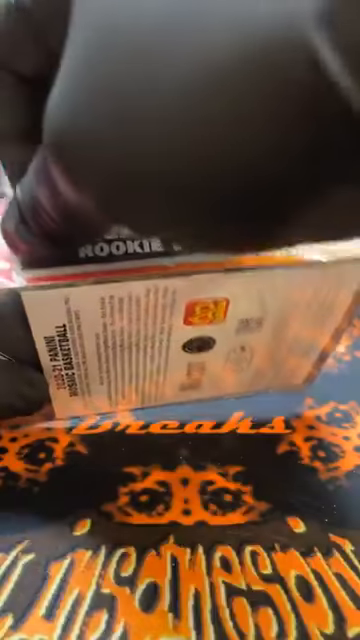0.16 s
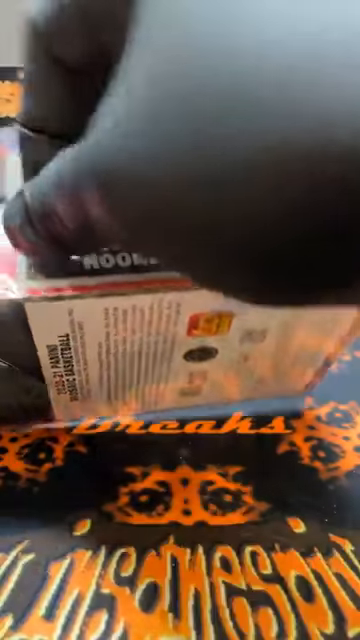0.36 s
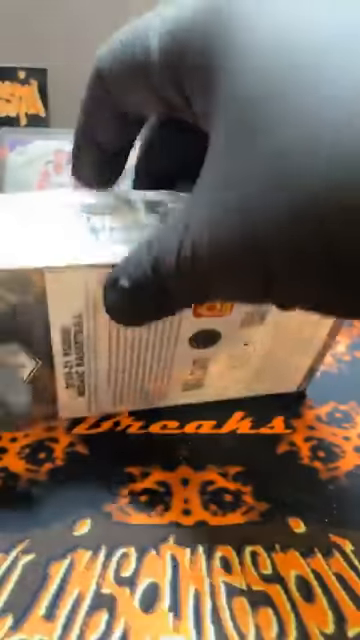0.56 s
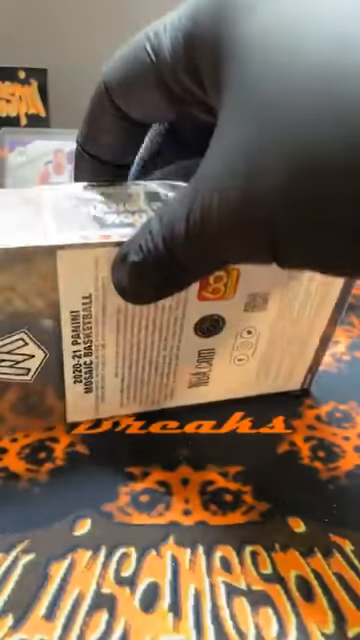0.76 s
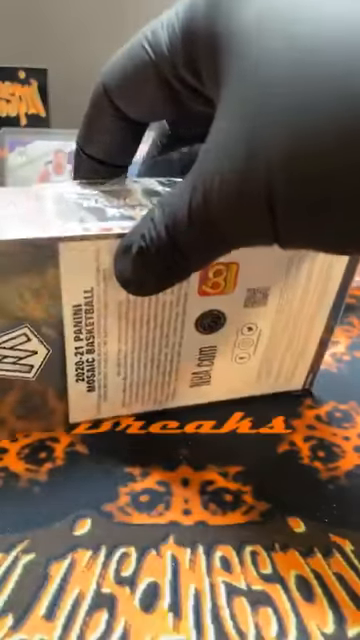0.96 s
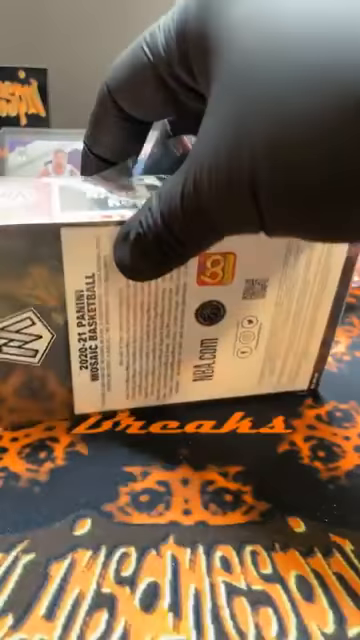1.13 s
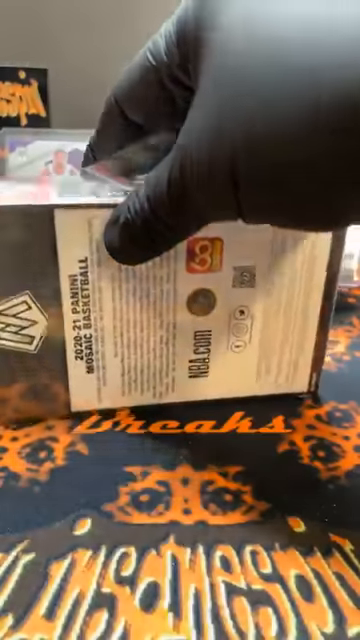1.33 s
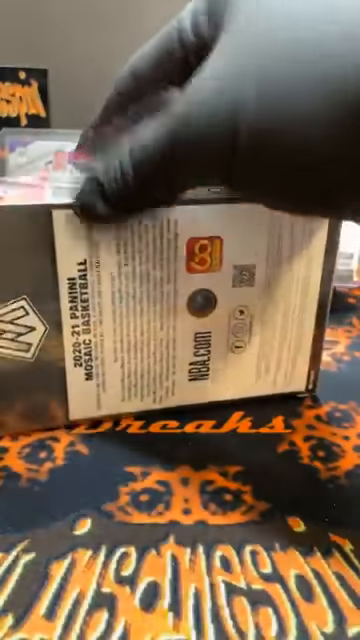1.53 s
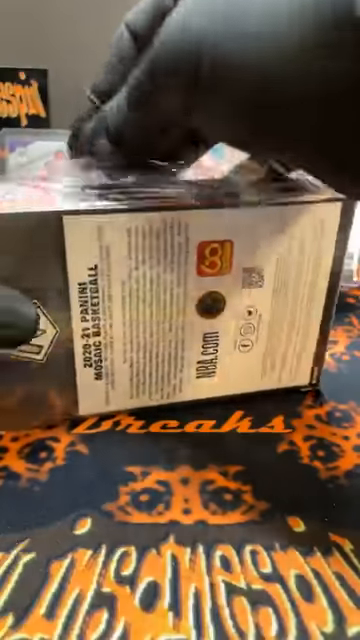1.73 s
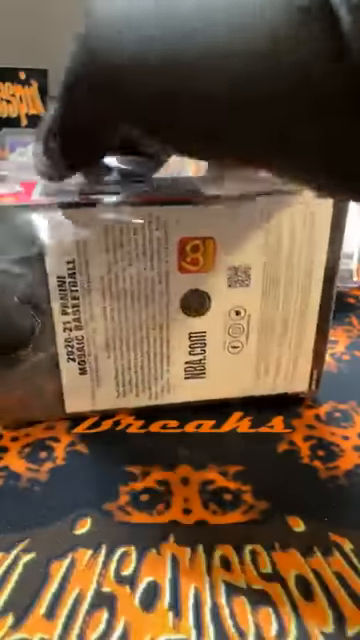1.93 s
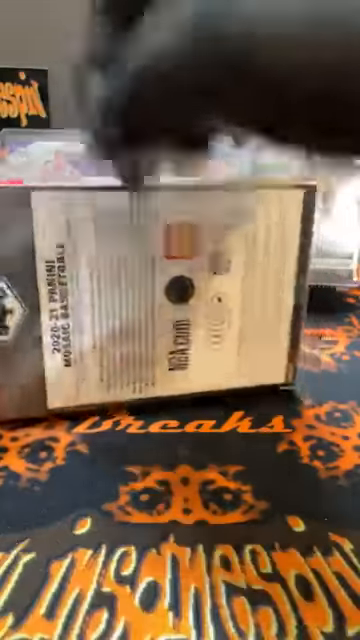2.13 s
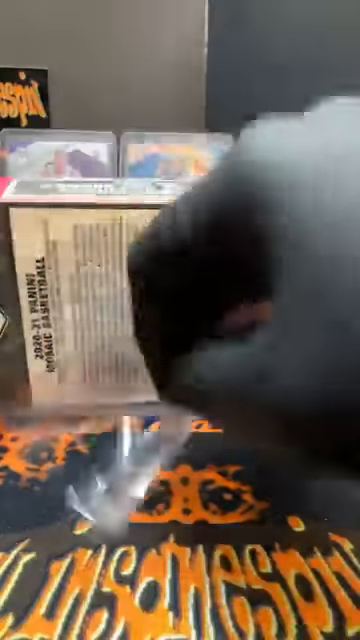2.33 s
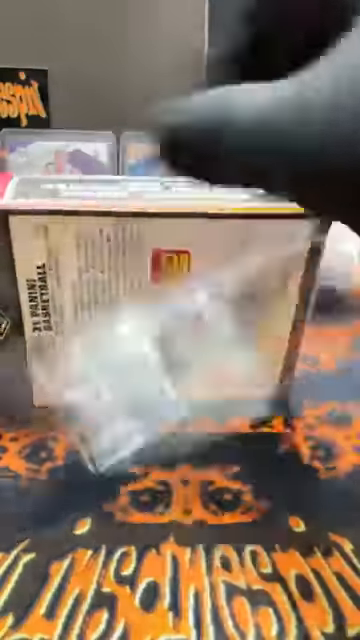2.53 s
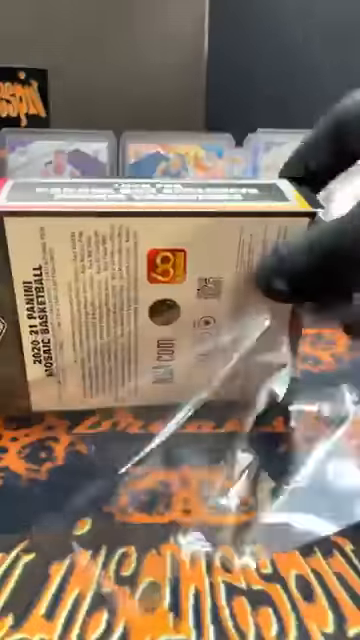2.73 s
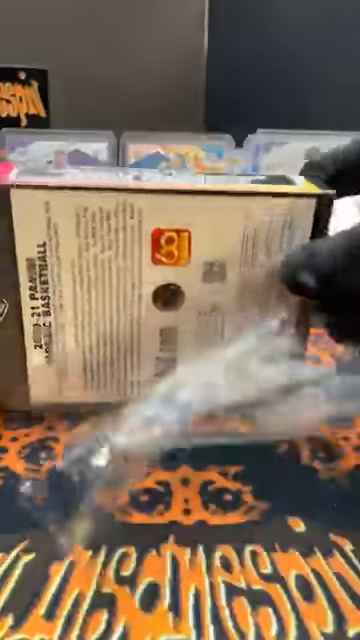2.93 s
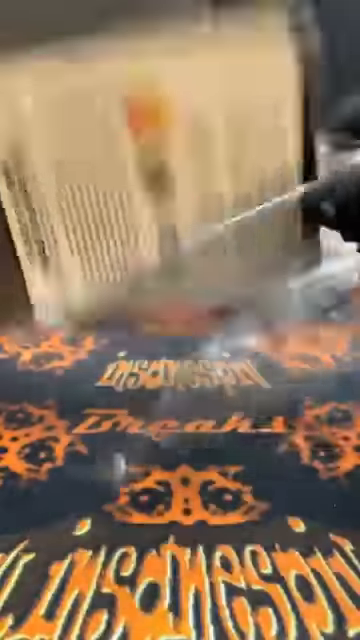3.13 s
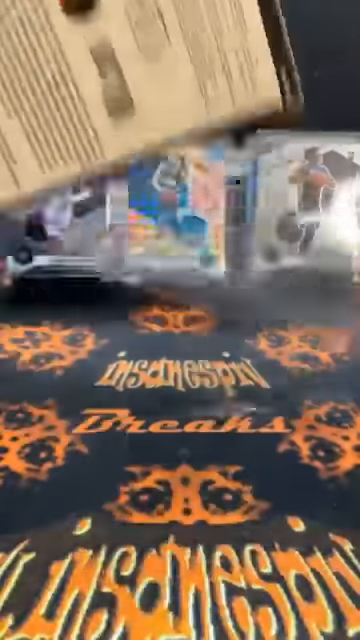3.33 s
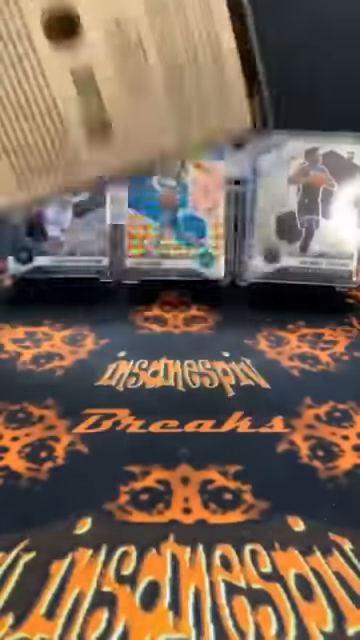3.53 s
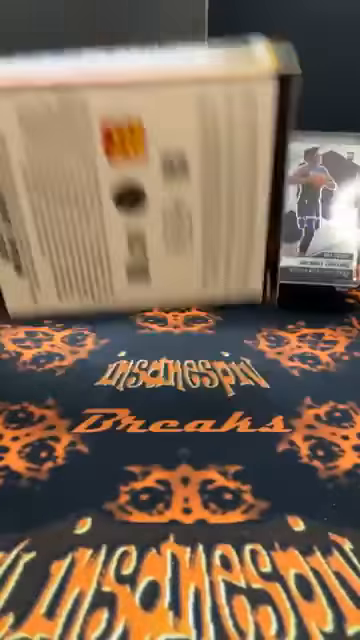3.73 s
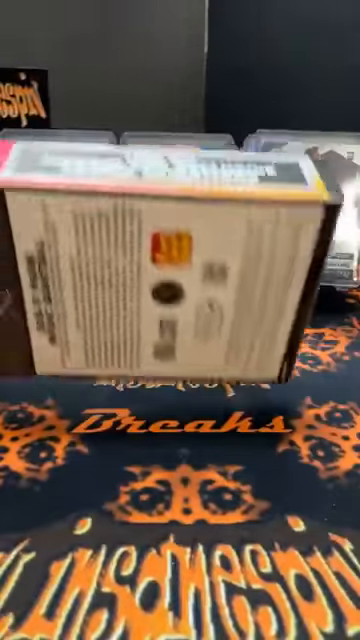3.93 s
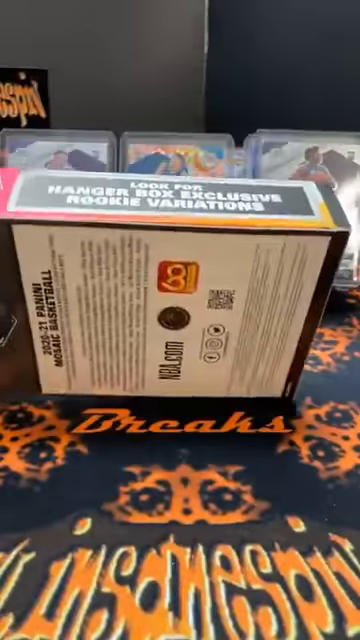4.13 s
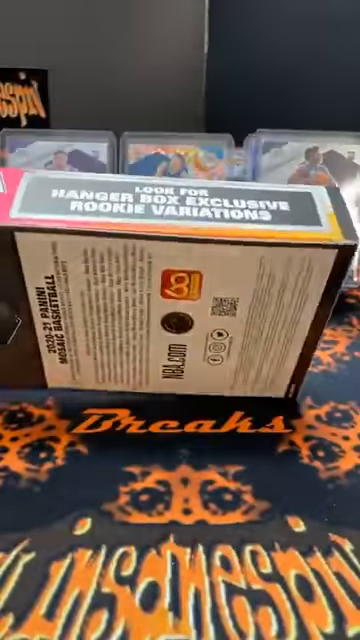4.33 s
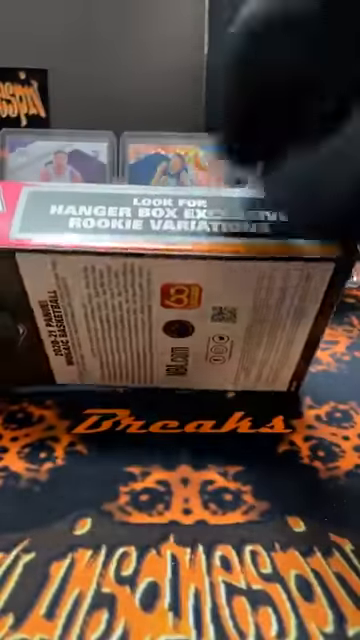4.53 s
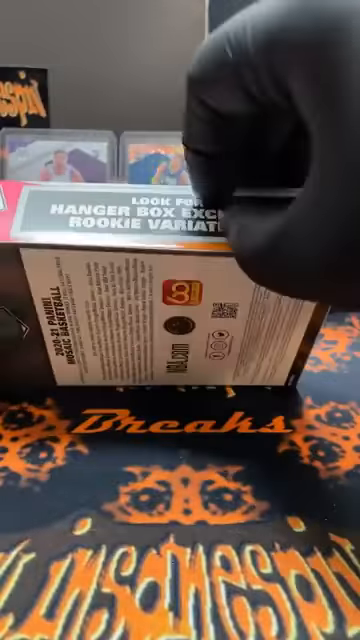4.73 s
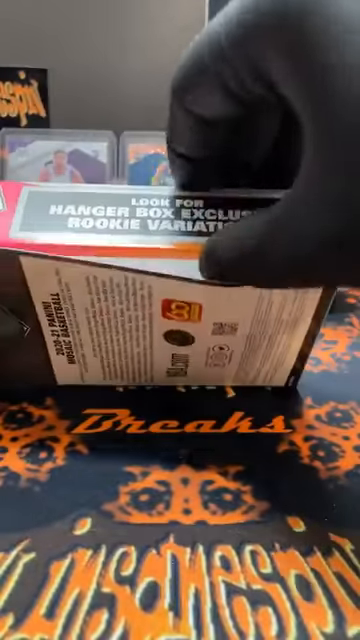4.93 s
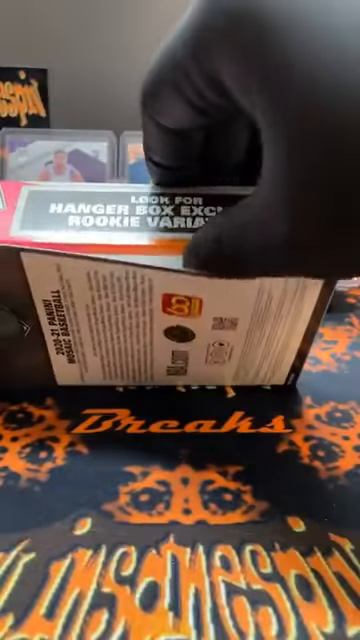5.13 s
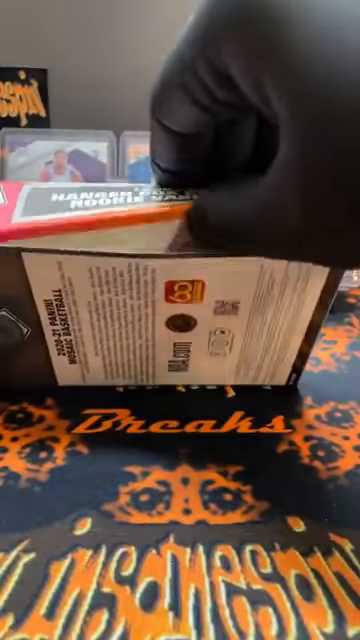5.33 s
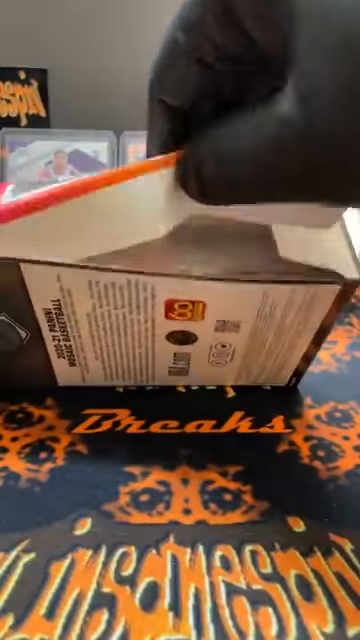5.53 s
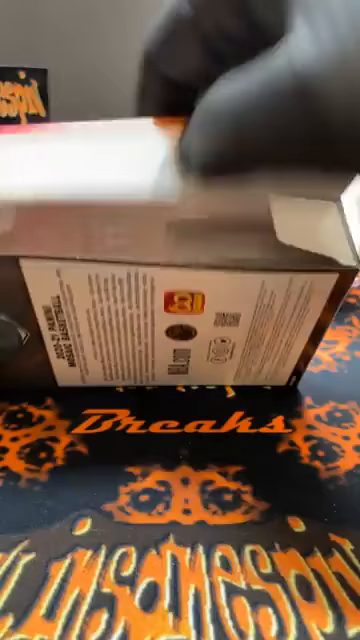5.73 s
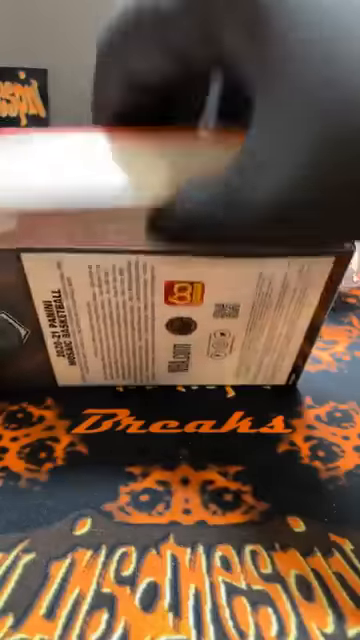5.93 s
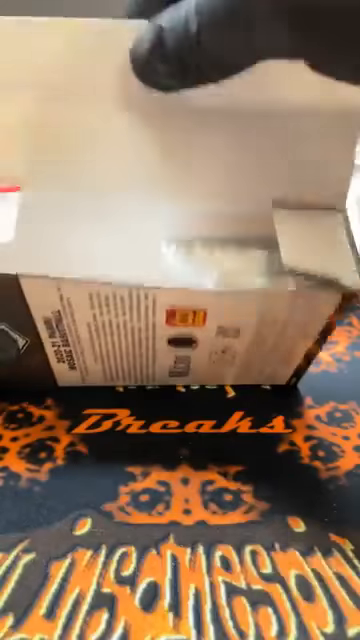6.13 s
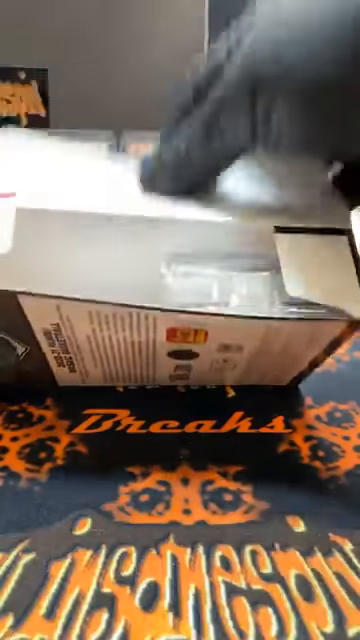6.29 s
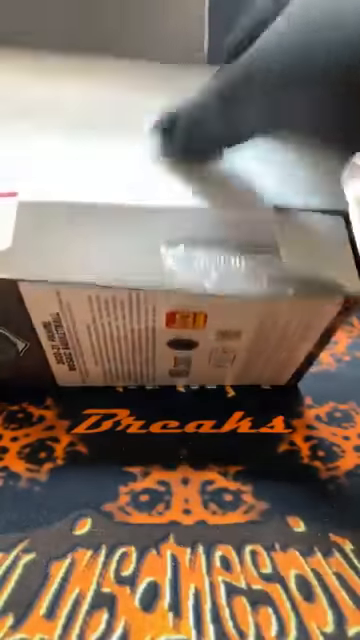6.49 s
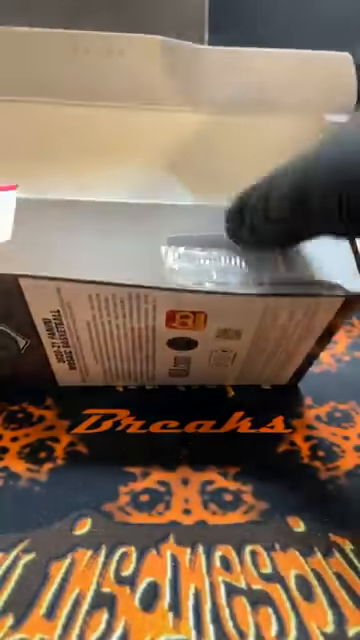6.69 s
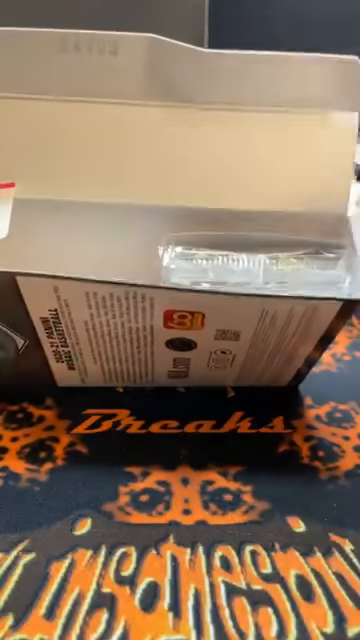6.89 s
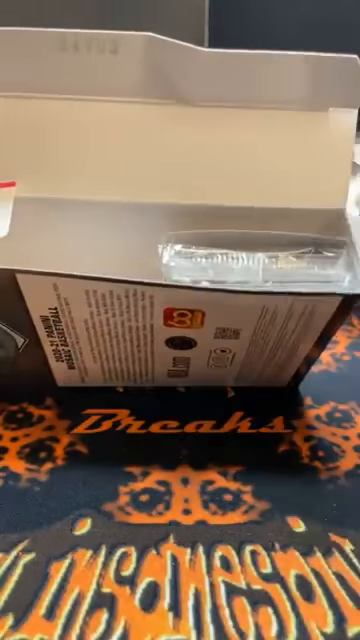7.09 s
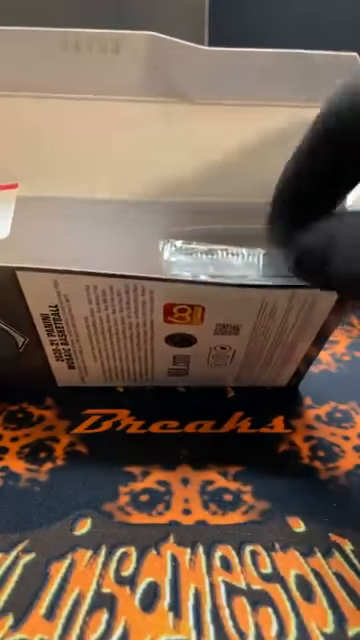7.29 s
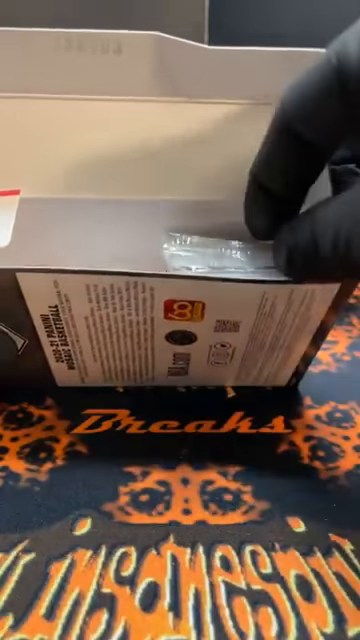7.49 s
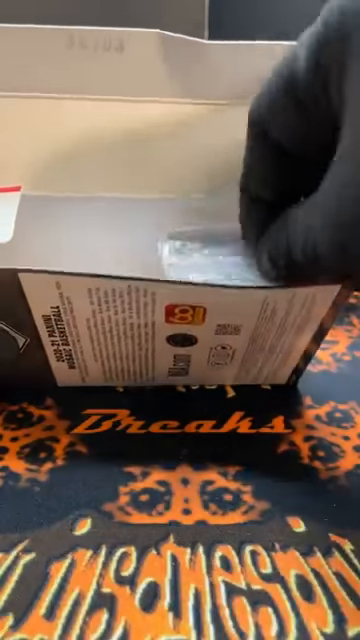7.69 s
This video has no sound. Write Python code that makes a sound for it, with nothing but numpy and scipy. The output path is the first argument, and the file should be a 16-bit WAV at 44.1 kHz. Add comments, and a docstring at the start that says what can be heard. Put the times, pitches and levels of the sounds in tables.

```python
"""Unwrapping a small carton

Gloved hands pull the stiff film off a small carton, pry its flap open and reach for a foil pack inside.
Creases in film, card and foil buckle and snap; gloves rustle, creak and glide over the walls. The hollow
carton knocks under the fingers and thumps on the mat, under a close microphone in a quiet room."""
import sys
import numpy as np
from scipy import signal
from scipy.fft import rfft, irfft, next_fast_len
from scipy.io import wavfile
from scipy.ndimage import uniform_filter1d

SR = 44100
rng = np.random.default_rng(int(sys.argv[2]) if len(sys.argv) > 2 else 0)


def waveform_to_disk(signal):
    """Save audio, clipped to [-1, 1], as 16-bit WAV at the path in sys.argv[1]."""
    frames = np.transpose(np.atleast_2d(signal))
    scaled = np.clip(frames, -1, 1) * 32767
    samples = np.round(scaled).astype(np.int16)
    wavfile.write(sys.argv[1], SR, samples)


N = 341775
TIME = np.arange(N) / SR
LEAD = 2048   # samples of room for an event to swell before its cue
FILM_LOOSE_S, FILM_OFF_S = 3.35, 3.75   # the film lifts from the walls, then comes away
CARD_S, OPEN_S, FOIL_S = 4.5, 5.55, 7.28   # nails start on the flap, it opens, fingers reach the foil
# resonances of the air in the opened carton: f/Hz, width/Hz, level/dB
AIR_MODES = [(780, 55, 6.5), (1840, 310, 5), (4800, 200, -7), (5510, 590, -3.5), (3000, 210, -7.5),
             (3600, 140, -3.5), (4200, 200, -13.5)]


def snaps():
    """A crease buckles in a spray of tiny cracks: the freed patch rings briefly, the treble dies first."""
    # creases giving way: t/s, level/dB, ring f/Hz, t60/s
    creases = [(0.0305, -10.5, 5830, 0.0023), (0.0527, -1.5, 2050, 0.011), (0.0657, -8, 2000, 0.0032),
               (0.082, -8, 4000, 0.01), (0.137, -23, 4560, 0.006), (0.169, -28.5, 5500, 0.0049),
               (0.182, -31.5, 5500, 0.0044), (0.2367, -4.5, 2070, 0.0074), (0.25, -12.5, 8000, 0.0086),
               (0.2724, -14, 2180, 0.0055), (0.291, 0, 7600, 0.01), (0.3032, -18.5, 4000, 0.0059),
               (0.3471, -13, 5030, 0.0053), (0.3928, -9.5, 7550, 0.0028), (0.442, -8, 4660, 0.012),
               (0.5227, -3, 6000, 0.0039), (0.536, -8.5, 5700, 0.056), (0.6005, -8.5, 5700, 0.0092),
               (0.6165, -10, 4100, 0.057), (0.6598, -9.5, 7300, 0.039), (0.7856, -30, 4500, 0.0045),
               (0.8145, -15.5, 4130, 0.003), (0.826, -18, 4700, 0.016), (0.841, -15, 4700, 0.013),
               (0.8599, -5, 4600, 0.0015), (0.958, -21, 4200, 0.008), (1.038, -8, 4240, 0.006),
               (1.0457, -9, 4950, 0.0087), (1.0532, -7, 6800, 0.0052), (1.0938, -3.5, 5100, 0.0047),
               (1.1292, -5.5, 6030, 0.0057), (1.148, -19.5, 2410, 0.02), (1.169, -4, 5500, 0.029),
               (1.2814, -22.5, 5560, 0.0051), (1.324, -9.5, 7200, 0.027), (1.353, -6, 8450, 0.0038),
               (1.3669, -2, 2700, 0.0021), (1.3817, -14.5, 3120, 0.074), (1.388, -27, 3450, 0.008),
               (1.4117, -6.5, 3300, 0.0055), (1.435, -8.5, 6170, 0.013), (1.4443, -15, 3230, 0.025),
               (1.469, -12, 5900, 0.064), (1.5052, -18.5, 5250, 0.089), (1.554, -25.5, 3800, 0.008),
               (1.605, -26, 4450, 0.0099), (1.613, -18, 4960, 0.01), (1.617, -3.5, 4180, 0.013),
               (1.627, -14.5, 5040, 0.062), (1.646, -15, 4000, 0.015), (1.6625, -18.5, 3500, 0.0076),
               (1.672, -25, 4200, 0.007), (1.69, -23.5, 5000, 0.008), (1.7105, -11.5, 7900, 0.019),
               (1.724, -9, 1920, 0.0078), (1.729, -13, 5540, 0.0079), (1.748, -4.5, 6000, 0.013),
               (1.7662, -6, 3280, 0.012), (1.773, -7.5, 2250, 0.038), (1.7853, -20, 3070, 0.0061),
               (1.7948, -9.5, 8930, 0.0061), (1.8183, -11, 3340, 0.0075), (1.824, -20.5, 2500, 0.012),
               (1.855, -18, 7000, 0.006), (1.8626, -1.5, 5140, 0.036), (1.8797, -4, 4000, 0.023),
               (1.8927, -7, 4150, 0.025), (1.898, -4.5, 3770, 0.011), (1.917, -20, 3670, 0.014),
               (1.9627, -15.5, 4730, 0.011), (1.995, -18.5, 3060, 0.0043), (2.029, -22, 7050, 0.008),
               (2.0497, -8, 3250, 0.0058), (2.0627, -4, 5700, 0.011), (2.081, -14, 4200, 0.0055),
               (2.0883, -8, 5900, 0.028), (2.0982, -13.5, 4430, 0.078), (2.106, -5.5, 7750, 0.015),
               (2.131, -17, 2470, 0.01), (2.1365, -8.5, 4800, 0.0082), (2.1827, -17, 5900, 0.008),
               (2.197, -18, 4670, 0.019), (2.2126, -3, 2180, 0.0059), (2.2147, -2.5, 5360, 0.011),
               (2.271, -7.5, 2630, 0.014), (2.2844, -9.5, 2030, 0.0059), (2.29, -13, 7350, 0.0086),
               (2.3099, -8, 8600, 0.0091), (2.324, -11, 5140, 0.0052), (2.345, -9.5, 7500, 0.0079),
               (2.371, -4, 3080, 0.0031), (2.413, -20, 5500, 0.006), (2.419, -26, 4000, 0.0099),
               (2.4267, -10, 8700, 0.014), (2.4646, -5.5, 5560, 0.023), (2.4685, -2.5, 7800, 0.025),
               (2.472, -5, 5950, 0.013), (2.492, -16, 3970, 0.031), (2.4983, -9.5, 3500, 0.065),
               (2.5657, -13.5, 1590, 0.0082), (2.5753, -4.5, 5440, 0.036), (2.579, -11.5, 3560, 0.042),
               (2.585, -14, 4470, 0.022), (2.598, -11, 2450, 0.025), (2.605, -15, 3500, 0.02),
               (2.6574, -9, 2250, 0.012), (2.6873, -30, 5000, 0.008), (2.7126, -3, 5030, 0.012),
               (2.7517, -7.5, 3680, 0.053), (2.7636, -10, 5500, 0.011), (2.773, -5, 3580, 0.02),
               (2.7957, -4, 4800, 0.019), (2.835, -13.5, 7560, 0.019), (2.9148, -6.5, 3900, 0.066),
               (2.926, -16.5, 2980, 0.026), (2.9572, -5, 5370, 0.0096), (2.9681, -7, 6900, 0.013),
               (3.06, -28, 5100, 0.0099), (3.073, -29, 6440, 0.0074), (3.082, -30, 1970, 0.014),
               (3.1603, -16.5, 5360, 0.013), (3.177, -11.5, 3250, 0.032), (3.1963, -7.5, 2520, 0.012),
               (3.206, -8.5, 7550, 0.024), (3.229, -6, 3670, 0.017), (3.2417, -6, 3480, 0.12),
               (3.255, -8.5, 5170, 0.033), (3.284, -10.5, 5360, 0.076), (3.2923, -19.5, 5500, 0.012),
               (3.3057, -26, 5610, 0.013), (3.355, -23, 5500, 0.008), (3.376, -37, 5350, 0.008),
               (3.4078, -17, 6400, 0.024), (3.5161, -12.5, 6950, 0.002), (3.528, -21.5, 2430, 0.025),
               (3.559, -17.5, 6900, 0.007), (3.591, -14, 3480, 0.014), (3.611, -20, 3490, 0.013),
               (3.6204, -9, 6150, 0.0041), (3.644, -17, 3660, 0.0052), (3.6568, -9.5, 4860, 0.0047),
               (3.6607, -7.5, 7330, 0.0085), (3.874, -17, 7200, 0.024), (3.917, -27, 6670, 0.094),
               (4.336, -6.5, 3950, 0.01), (4.562, -16, 3700, 0.019), (4.652, -18, 6230, 0.0061),
               (4.87, -32, 3900, 0.018), (4.915, -19.5, 5600, 0.041), (4.923, -18.5, 3180, 0.019),
               (4.984, -32, 1660, 0.036), (5.0711, -15.5, 6800, 0.0027), (5.192, -28.5, 5800, 0.0039),
               (5.229, -26, 2750, 0.0031), (5.241, -18.5, 2220, 0.028), (5.472, -23, 4300, 0.0085),
               (5.484, -19, 5800, 0.022), (5.5325, -8.5, 4200, 0.031), (5.5352, -3.5, 2130, 0.012),
               (5.544, -12, 4500, 0.015), (5.5578, -13, 3600, 0.0068), (5.611, -40.5, 1480, 0.016),
               (5.645, -48, 3160, 0.01), (5.7243, -6, 3400, 0.0053), (5.773, -35, 1260, 0.011),
               (5.793, -41, 1010, 0.011), (5.818, -17, 3140, 0.027), (5.987, -37.5, 1250, 0.021),
               (5.997, -42, 3200, 0.012), (6.026, -42, 1690, 0.013), (6.097, -41, 1280, 0.015),
               (6.156, -41, 1550, 0.023), (6.203, -37, 7000, 0.006), (6.2113, -27, 5400, 0.014),
               (6.235, -34, 6500, 0.006), (6.3536, -15, 1860, 0.0043), (6.401, -43, 5950, 0.014),
               (6.5, -28, 5400, 0.04), (6.515, -27.5, 3600, 0.021), (6.708, -45.5, 4550, 0.043),
               (6.738, -59.5, 2030, 0.011), (7.093, -42, 4540, 0.01), (7.3817, -8.5, 9200, 0.013),
               (7.485, -21.5, 5530, 0.0046), (7.507, -11.5, 7800, 0.01), (7.5333, -17.5, 5600, 0.0072),
               (7.549, -22.5, 8360, 0.013), (7.5813, -15.5, 6040, 0.0061), (7.6105, -10, 4750, 0.0018),
               (7.6258, -12, 6770, 0.01), (7.6588, -7, 5400, 0.005), (7.6876, -18.5, 6300, 0.015),
               (7.7218, -22.5, 2950, 0.0087)]
    out, noise = np.zeros(N), rng.standard_normal((len(creases), 2, 5632))
    first_crack = 3.0 * (np.arange(5632) == LEAD)
    for (s, peak_db, hz, t60), (body, edge) in zip(creases, noise):
        card = CARD_S < s < FOIL_S
        loose = FILM_LOOSE_S < s < CARD_S or s > FOIL_S
        woody_db = -8.5 if card and hz < 3300 and peak_db < -20 else 0   # low, soft card sprays little
        treble_db = -8 + 14.5 * np.log2(hz / 4000) + 6 * edge[0]   # higher rings are brighter
        treble_db += woody_db - 7 * card   # card is duller than film and foil
        clump_db = 3 * np.clip(t60 / .025 - .6, 0, 1)   # long snaps come in uneven clumps
        clumps = from_db(clump_db * rms_one(butter(body[::-1], 150, "low")))
        cracks = burst(clumps * body * np.abs(edge[::-1]) + first_crack, t60, swell_s=0.0054)
        spread = from_db(2 * body[0])   # some patches ring purer than others
        width_hz = 0.32 * hz * spread
        ring = resonance(resonance(cracks, hz, width_hz), hz, width_hz) / np.sqrt(spread)
        lowest_hz = (0.39 if loose else 0.37) * hz   # film held by the walls reaches deeper
        spray = from_db(0.14 * treble_db - 7.5 + woody_db) * butter(cracks, [lowest_hz, 8000], "band")
        treble = butter(burst(edge, 0.6 * t60 + .002, swell_s=0.004), [8000, 16500], "band")
        add(out, s, 0.63 * ring + spray + from_db(treble_db - 16.5) * treble, peak_db)
    return out


def squeak(hz=5100, width_hz=300):
    """A taut patch of film lets go at once and rings at one pitch."""
    out, crack = np.zeros(N), burst(rng.standard_normal(4096), t60=0.012, swell_s=0.0026)
    ring = resonance(resonance(crack, hz, width_hz), hz, width_hz)
    add(out, s=0.3992, sound=ring + 0.0087 * crack, peak_db=-6.5)
    return out


def carton(x, hz, reach_octaves, shift=1):
    """The walls answer most in the modes near the pitch of the pressed panel."""
    # modes of the free walls: f/Hz, width/Hz, level/dB
    wall_modes = [(248, 174, 16), (418, 149, 6), (572, 117, 4), (740, 150, 6), (860, 276, 4.5),
                  (1083, 133, 8), (1144, 170, 3), (1443, 240, 5.5), (1594, 306, 3.5), (1940, 300, -11),
                  (2220, 1000, 7)]
    out, grip_damping = 0, 1.5
    for k, (mode_hz, width_hz, db) in enumerate(wall_modes):
        away_db = 35.1 * (np.log2(shift * mode_hz / hz) / reach_octaves) ** 2
        out += (-1) ** k * from_db(db - away_db) * resonance(x, shift * mode_hz, grip_damping * width_hz)
    return out


def knocks():
    """A tap and a short scuffing push set the carton walls ringing."""
    # fingers working the walls: t/s, level/dB, panel f/Hz
    pushes = [(0.0538, -10, 835), (0.2379, -25, 1060), (0.3051, -23, 680), (0.5248, -22.5, 600),
              (0.624, -22, 600), (0.2523, -24.5, 730), (0.348, -24, 790), (0.8399, -22.5, 340),
              (0.922, -26, 371), (1.147, -30, 715), (2.86, -25, 780), (1.055, -33, 600), (1.095, -12, 700),
              (1.1717, -17, 545), (1.769, -23, 516), (1.8844, -36, 860), (2.1106, -16.5, 740),
              (2.1334, -21, 780), (2.7552, -29, 660), (2.8378, -24, 540), (3.121, -34, 990),
              (3.1651, -22.5, 553), (3.2068, -13, 860), (3.2267, -16.5, 650), (3.2449, -31, 770),
              (3.5929, -23.5, 340), (4.6283, -12, 600), (4.9075, -14.5, 665), (4.9155, -12, 670),
              (4.989, -29, 590), (5.2445, -13, 573), (5.5366, -8.5, 590), (5.726, -18, 600),
              (5.7299, -4.5, 297), (5.8179, -17, 467), (6.355, -14, 373), (6.773, -40.5, 890),
              (6.7897, -33, 490), (6.89, -39, 583), (7.068, -30, 348)]
    out, noise = np.zeros(N), rng.standard_normal((len(pushes), 5632))
    tap = 6.0 * (np.arange(5632) == LEAD)
    for (s, peak_db, hz), scuff in zip(pushes, noise):
        t60 = 0.01554 * from_db(0.038 * (peak_db + 10.5))   # harder pushes last longer
        push = burst(scuff + tap, t60, swell_s=0.011)
        shift = 1 + 0.07 * np.tanh(scuff[0])   # holding a wall shifts its modes
        add(out, s - .001, carton(push, hz, reach_octaves=0.85, shift=shift), peak_db)
    return out


def thumps(lag_s=0.01354):
    """The carton bumps the mat: a few low cycles sag as the contact settles; the table answers lower."""
    # bumps on the mat: t/s, level/dB, settled f/Hz
    bumps = [(0.464, -25.5, 90), (0.532, -25, 205.4), (0.588, -31, 118.5), (0.832, -25, 204.6),
             (1.09, -15.5, 97), (1.162, -31, 118), (1.763, -24.5, 176.5), (1.863, -26.5, 100.4),
             (2.109, -21, 94), (2.213, -26, 122), (2.828, -34, 129.6), (3.243, -22, 204.8),
             (4.645, -26, 108), (4.914, -21, 114.7), (5.231, -27.5, 163), (5.535, -20.5, 94.4),
             (5.722, -14, 143.4), (6.005, -31, 96), (6.137, -24.5, 163), (6.353, -29.5, 96),
             (6.783, -40, 193), (6.862, -25, 86.3), (7.062, -39, 224), (7.698, -38.5, 126)]
    out, t = np.zeros(N), np.arange(9728) / SR
    for s, peak_db, hz in bumps:
        sag = 0.0039 * np.exp(-np.maximum(t - LEAD / SR, 0) / 0.0021)
        phase = 2 * np.pi * hz * (t - sag)
        boom = np.sin(phase) + 0.7 * np.sin(0.588 * phase)
        add(out, s + lag_s, burst(boom, t60=0.1, swell_s=0.05), peak_db)
    return out


def creaks(swell_db=8.5, wobble=0.076):
    """A finger or the flap's edge stutters over a wall in quick slips, driving the modes near their rate."""
    # stutters: t/s, length/s, level/dB, first and target slip f/Hz, roughness/0-1, alternate-slip limp/0-1
    stutters = [(0.088, 0.035, -29, 1425, 740, 0.05, 0.01), (0.965, 0.0097, -17.5, 907, 860, 0.16, 0.49),
                (0.981, 0.002, -19, 894, 855, 0.2, 0.11), (0.989, 0.0215, -12.5, 875, 692, 0.45, 0.17),
                (1.018, 0.013, -8, 813, 850, 0.49, 0.23), (5.333, 0.016, -24, 549, 543, 0.26, 0.009),
                (5.358, 0.022, -26, 750, 750, 0.78, 0.01), (5.394, 0.041, -31, 555, 570, 0.51, 0.01),
                (5.442, 0.054, -27.5, 578, 595, 0.51, 0.01), (5.486, 0.029, -26, 600, 600, 0.6, 0.01)]
    out, t = np.zeros(N), (np.arange(4096) - LEAD) / SR
    noise = rng.standard_normal((len(stutters), 2, 4096))
    for (s, length_s, peak_db, hz, end_hz, rough, limp), (wander, grit) in zip(stutters, noise):
        glide_hz = end_hz + (hz - end_hz) * np.exp(-2.5 * np.maximum(t, 0) / length_s)
        cycles = np.cumsum(glide_hz * (1 + wobble * rms_one(butter(wander, 110, "low")))) / SR
        sawtooth = cycles % 1 - .5 + limp * np.sin(np.pi * cycles)
        slips = (1 - rough) * sawtooth + rough * grit
        press = from_db(swell_db * t / length_s) * (t > 0) * (t < length_s)
        add(out, s, carton(slips * press, np.sqrt(hz * end_hz), reach_octaves=1.56), peak_db)
    return out


def handling():
    """Crackle over an uneven slide of glove on film and card; part of the rubbing sounds through the walls."""
    # constant handling: t/s, rustle level/dB, its treble share/dB, rubbing level/dB
    bed = [(0.0, -54.5, 13.5, -41), (0.3, -33.5, 1, -36), (0.78, -46, 5.5, -41.5), (1.27, -51, 14, -47.5),
           (1.6, -47.5, 3.5, -37), (2.8, -32, 1, -37.5), (3.42, -46, -1.5, -46), (3.72, -88.5, 7.5, -58.5),
           (4.15, -54.5, -17.5, -56.5), (4.8, -64.5, 8.5, -49.5), (5.65, -80, -9, -49),
           (6.35, -55.5, -8.5, -53.5), (6.64, -97, 0.5, -66.5), (7.3, -63.5, -5, -63),
           (7.75, -51.5, 8.5, -39.5)]
    # tone curve of the rustle: f/Hz, gain/dB
    rustle_eq = [(600, -47), (1200, 23), (1700, 22.5), (3700, 23), (5700, 17.5), (9000, 2.5), (15500, -8.5)]
    times, *columns = np.transpose(bed)
    bed_rustle, treble, bed_rub = [from_db(np.interp(TIME, times, db)) for db in columns]
    pull, drag = strokes()
    rustle_gain, rub_gain = np.hypot(bed_rustle, pull), np.hypot(bed_rub, drag)
    slide, scrape = rng.standard_normal((2, N))
    # patches of glove catch and let go, each at its own pace
    patches = sum((-1) ** k * from_db(3.5 * drift(26)) * rms_one(resonance(slide, hz, hz / 2)) * np.sqrt(hz)
                  for k, hz in enumerate(np.geomspace(1000, 15000, 12)))
    # a firmer grip crackles more, bare card less
    bare_card = (TIME > FILM_OFF_S) & (TIME < FOIL_S)
    crumpling = from_db(0.083 * (20 * np.log10(rustle_gain) + 70) - 5 * bare_card)
    friction = (crumpling * crackle() + rms_one(patches)) / np.sqrt(1 + crumpling ** 2)
    hollow = sum(from_db(db) * rms_one(resonance(friction, hz, width)) for hz, width, db in AIR_MODES)
    opened = (TIME > OPEN_S) & (TIME < FOIL_S)
    rustle = colour(friction, rustle_eq) + from_db(5) * rms_one(hollow) * opened
    low, high = butter(rustle, 9000, "low", order=4), butter(rustle, 8800, "high", order=4)
    rub = carton(from_db(3 * drift(30)) * scrape, hz=714, reach_octaves=2.18)
    return rustle_gain * (rms_one(low) + treble * rms_one(high)) + rub_gain * rms_one(rub)


def strokes(attack_db_per_s=1184, release_db_per_s=346):
    """Each stroke of the hands sets in fast, holds and trails off: gains of rustle and of rubbing."""
    # single pulls and slides: t/s, hold/s, rustle level/dB, rubbing level/dB
    pulls = [(0.0, 0.0067, -35.5, -25), (0.463, 0.049, -25.5, -24.5), (0.964, 0.19, -36.5, -32.5),
             (1.079, 0.056, -36, -28), (1.359, 0.11, -34, -43.5), (1.679, 0.25, -27, -33.5),
             (2.088, 0.1, -31, -31), (2.246, 0.072, -25.5, -36), (2.445, 0.13, -29, -48),
             (2.726, 0.15, -29.5, -33), (2.912, 0.022, -21, -27), (3.061, 0.011, -54, -47),
             (3.157, 0.17, -25.5, -28), (3.21, 0.082, -20, -49), (3.555, 0.1, -36, -42.5),
             (3.798, 0.0018, -68.5, -47.5), (3.876, 0.12, -41, -42), (4.75, 0.0046, -55, -62),
             (4.25, 0.048, -49, -47), (4.36, 0.024, -37, -48), (4.595, 0.068, -43, -35),
             (5.056, 0.048, -54.5, -46), (5.207, 0.12, -62.5, -46.5), (5.337, 0.019, -37.5, -38),
             (5.459, 0.052, -37.5, -32), (5.531, 0.026, -29, -24.5), (5.683, 0.041, -40.5, -29.5),
             (5.79, 0.088, -54.5, -47.5), (5.985, 0.036, -60, -49.5), (6.188, 0.017, -62.5, -45.5),
             (6.344, 0.007, -62, -37), (6.495, 0.02, -44.5, -41.5), (6.518, 0.066, -56, -52.5),
             (6.731, 0.055, -70.5, -59), (6.849, 0.045, -63, -49), (7.031, 0.1, -60, -54),
             (7.142, 0.018, -65.5, -51.5), (7.232, 0.0056, -85, -74), (7.362, 0.076, -49, -45.5),
             (7.504, 0.3, -46.5, -48.5)]
    t, power = np.arange(0, N + 64, 32) / SR, 0
    for s, hold_s, *levels_db in pulls:
        away_db = attack_db_per_s * np.maximum(s - t, 0) + release_db_per_s * np.maximum(t - s - hold_s, 0)
        power += from_db(2 * (np.array(levels_db)[:, None] - away_db))
    return [np.interp(TIME, t, gain) for gain in np.sqrt(power)]


def crackle(grains_per_s=380, t60=0.017):
    """Countless small creases give way in clumps, each a puff of noise around one of eight pitches."""
    clumps = from_db(3 * drift(32))
    sizes = from_db(4.5 * np.minimum(rng.exponential(1, N), 2.4))
    grains = sizes * (rng.random(N) < grains_per_s * clumps / SR)
    out, band, fade = 0, rng.integers(0, 8, N), from_db(-60 / (t60 * SR))
    for k, hz in enumerate(np.geomspace(1700, 9000, 8)):
        puffs = signal.lfilter([1], [1, -fade], grains * (band == k) + 1e-18) * rng.standard_normal(N)
        out += 0.5 * puffs + resonance(puffs, hz, 0.38 * hz) * np.sqrt(9000 / hz)
    return rms_one(out)


def settling(creases, t60=0.045, depth=0.33, quiet_db=-48):
    """The film rustles on just after each snap and falls still before the next: a gain around 1."""
    fade = from_db(-2 * 60 / (t60 * SR))
    stir = signal.lfilter([1 - fade], [1, -fade], creases ** 2) + from_db(2 * quiet_db)
    return (stir / uniform_filter1d(stir, SR // 6)) ** depth


def swishes():
    """A glove glides over smooth card and film: a soft band of hiss slides along, swelling and fading."""
    # glides: t/s, length/s, level/dB, start f/Hz, end f/Hz, width/Hz
    glides = [(3.79, 0.015, -38, 5150, 5150, 6000), (4.012, 0.074, -33, 7000, 5830, 5200),
              (4.084, 0.026, -36.5, 3000, 2990, 3000), (4.525, 0.037, -47, 4500, 4500, 2000),
              (5.331, 0.034, -34, 4640, 5500, 2480), (5.67, 0.087, -34, 5560, 4730, 2500),
              (5.68, 0.048, -26.5, 750, 856, 400), (5.349, 0.047, -26.5, 1100, 1128, 600),
              (6.05, 0.068, -48, 3140, 3000, 600), (6.27, 0.048, -42, 2800, 3300, 1000),
              (6.53, .085, -44, 6500, 6100, 4000), (6.9, 0.17, -54, 6230, 8860, 1300),
              (6.999, 0.095, -46, 5000, 5500, 1500), (7.281, 0.048, -37, 7000, 7500, 3630),
              (7.42, .03, -47, 7000, 7600, 3000)]
    out, t = np.zeros(N), (np.arange(12288) - LEAD) / SR
    noise = rng.standard_normal((len(glides), 2, 12288))
    for (s, length_s, peak_db, hz, end_hz, width_hz), (real, imag) in zip(glides, noise):
        along = np.clip(t / length_s, 0, 1)
        carrier = np.exp(2j * np.pi * np.cumsum(hz + (end_hz - hz) * along) / SR)
        hiss = np.real(butter(real + 1j * imag, width_hz / 2, "low") * carrier)
        add(out, s, hiss * np.sqrt(np.abs(np.sin(np.pi * along))), peak_db)
    return out


def echoes(x, t60=0.16):
    """Dense dull reflections from table, stands and walls."""
    t = np.arange(SR // 2) / SR
    wash = butter(rng.standard_normal(len(t)), 4400, "low", order=1)
    tail = wash * from_db(-60 * t / t60) * (t > .002)
    return signal.fftconvolve(x, tail / np.sqrt(np.sum(tail ** 2)))[:N]


def room_tone():
    """A faint low rumble whose level wavers."""
    # spectrum of the quiet room: f/Hz, level/dB
    spectrum = [(18, -76), (30, 0), (117, 12), (213, -6), (359, -1.5), (492, -10), (591, -50),
                (1200, -24.5), (1640, -33), (2760, -45.5), (5740, -33.5), (15500, -44.5)]
    return from_db(-49.5 + 2.2 * drift(3)) * colour(rng.standard_normal(N), spectrum)


def from_db(db):
    """Decibels to gain."""
    return 10 ** (np.asarray(db) / 20)


def rms_one(x):
    """Scale to rms 1."""
    return x / np.sqrt(np.mean(x ** 2) + 1e-20)


def butter(x, hz, kind, order=2):
    """Butterworth filter."""
    return signal.sosfilt(signal.butter(order, hz, kind, fs=SR, output="sos"), x)


def resonance(x, hz, width_hz):
    """Two-pole resonance, gain 1 on top."""
    r = np.exp(-np.pi * width_hz / SR)
    poles = [1, -2 * r * np.cos(2 * np.pi * hz / SR), r * r]
    return signal.lfilter(np.array([1, 0, -1]) * (1 - r * r) / 2, poles, x)


def colour(x, spectrum):
    """Shape a steady sound by a curve of (f/Hz, level/dB); rms 1."""
    size, (hz, db) = next_fast_len(N), np.transpose(spectrum)
    log_hz = np.log(np.fft.rfftfreq(size, 1 / SR) + 1)
    gain = from_db(np.interp(log_hz, np.log(hz), db))
    return rms_one(irfft(rfft(x, size) * gain, size)[:N])


def drift(hz, step=40):
    """Smooth random wander of rms 1, mostly slower than hz."""
    r = np.exp(-2 * np.pi * hz * step / SR)
    slow = signal.lfilter([1], [1, -2 * r, r * r], rng.standard_normal(N // step + 2002))[2000:]
    return np.interp(np.arange(N) / step, np.arange(len(slow)), rms_one(slow))


def burst(wave, t60, swell_s):
    """Swell by 60 dB in swell_s up to sample LEAD, then die away."""
    t = (np.arange(len(wave)) - LEAD) / SR
    return wave * from_db(60 * np.minimum(t / swell_s, -t / max(t60, .003)))


def add(out, s, sound, peak_db):
    """Mix one event in at peak_db, with its sample LEAD at time s."""
    i = round(s * SR) - LEAD
    start, part = max(i, 0), sound[max(-i, 0):N - i]
    out[start:start + len(part)] += part * from_db(peak_db) / np.abs(sound).max()


def scene():
    """Snaps ring in the walls they touch and in the opened carton, over hands, reflections and room tone."""
    creases = snaps() + squeak()
    touching = (TIME < FILM_LOOSE_S) | (TIME > CARD_S) & (TIME < FOIL_S)
    wall_drive = butter(creases * touching, [450, 1100], "band")
    walls = from_db(-4) * carton(wall_drive, hz=600, reach_octaves=3.3)
    opened = (TIME > OPEN_S) & (TIME < FOIL_S)
    hollow = sum(from_db(db + 5.5) * resonance(creases * opened, hz, width) for hz, width, db in AIR_MODES)
    near = creases + hollow + walls + knocks() + creaks() + swishes() + settling(creases) * handling()
    return (near + thumps() + room_tone() + from_db(-30) * echoes(near))[None]


def record(dry):
    """The small microphone loses the deepest bass; peaks are rounded, the very top rolls off and is cut."""
    rounded = .8 * np.tanh(butter(dry, 48, "high", order=3) / .8)
    soft = signal.sosfilt(signal.cheby2(8, 22, 16100, fs=SR, output="sos"), rounded)
    return signal.sosfilt(signal.cheby2(14, 60, 16990, fs=SR, output="sos"), soft)


dry = scene()
out = record(dry)
waveform_to_disk(out)
```